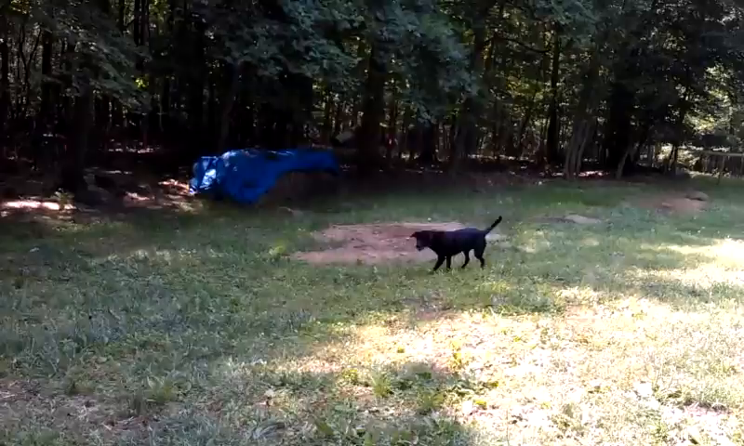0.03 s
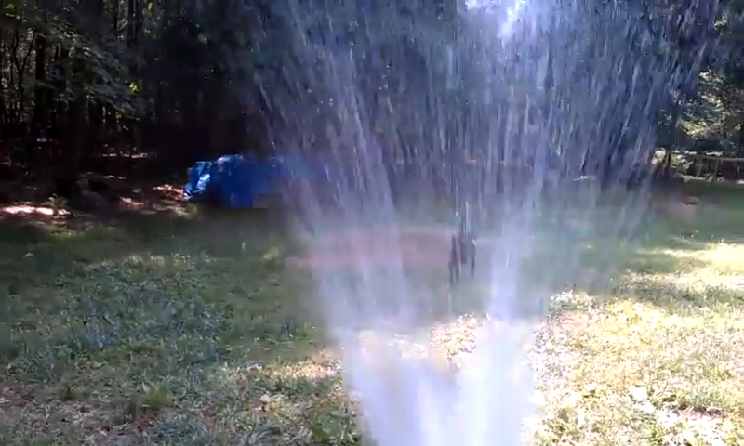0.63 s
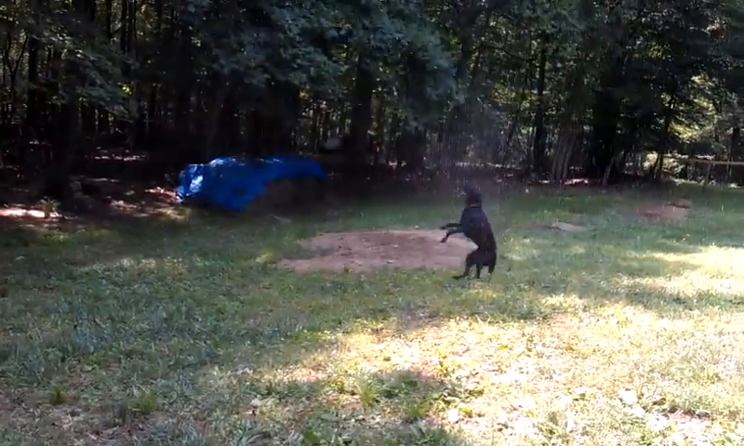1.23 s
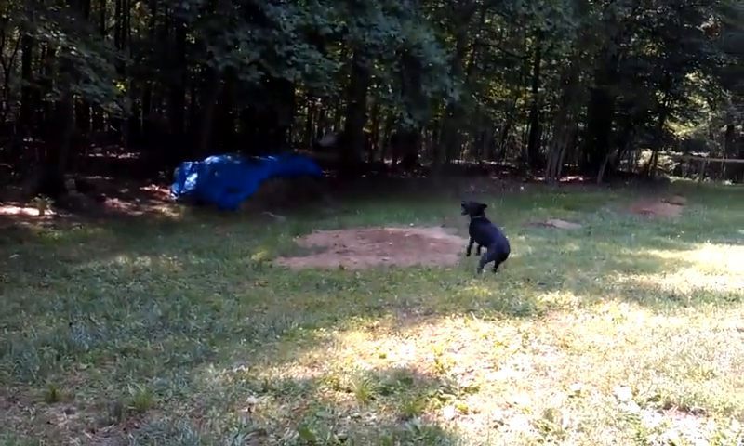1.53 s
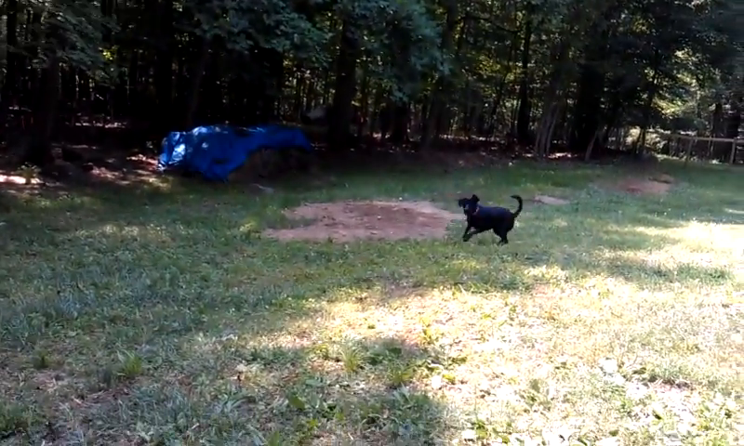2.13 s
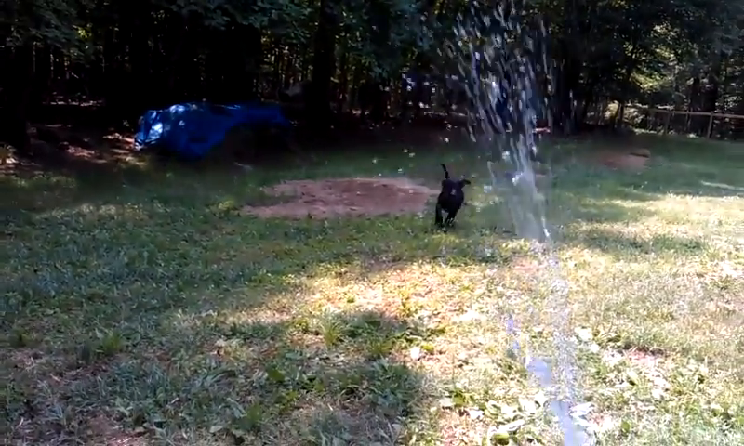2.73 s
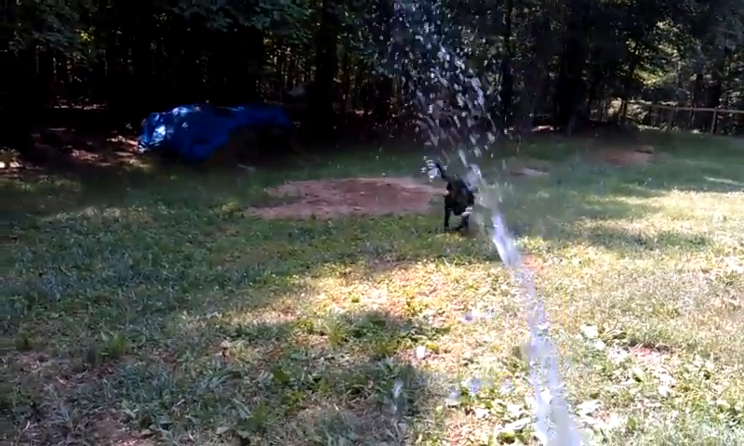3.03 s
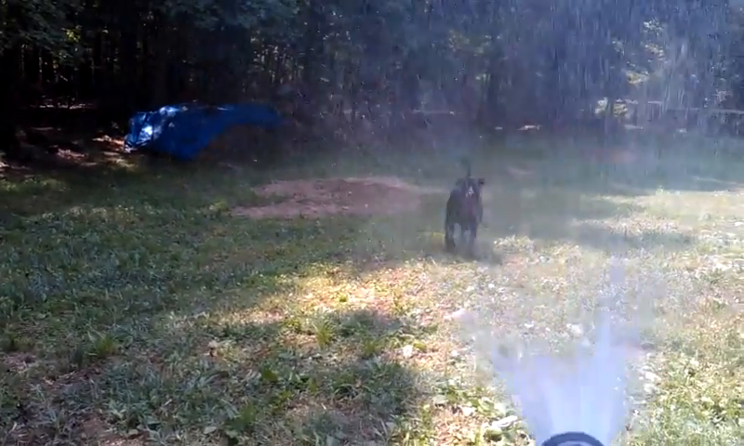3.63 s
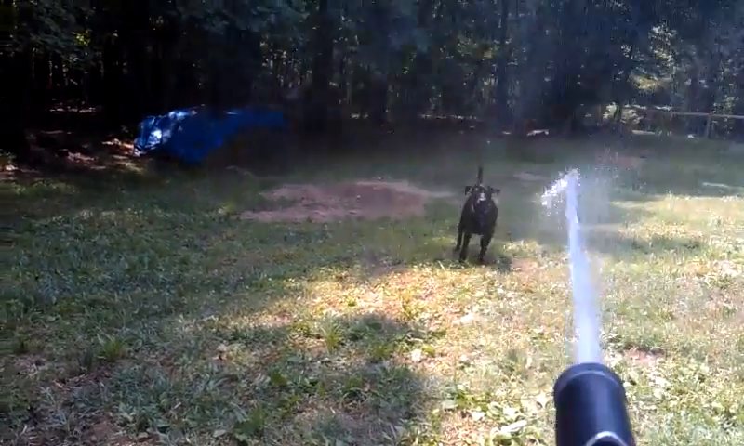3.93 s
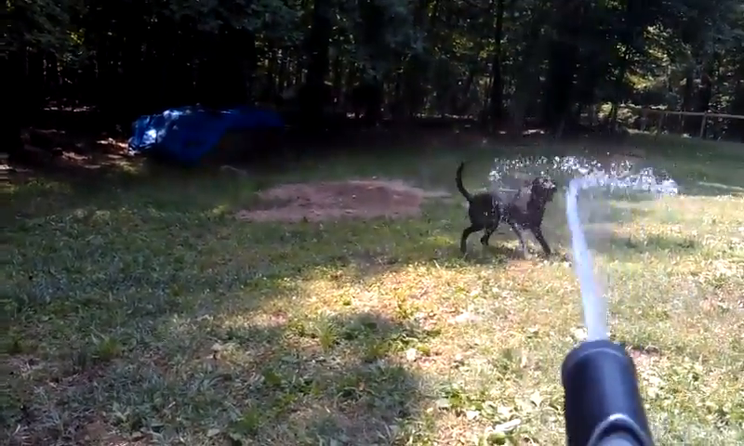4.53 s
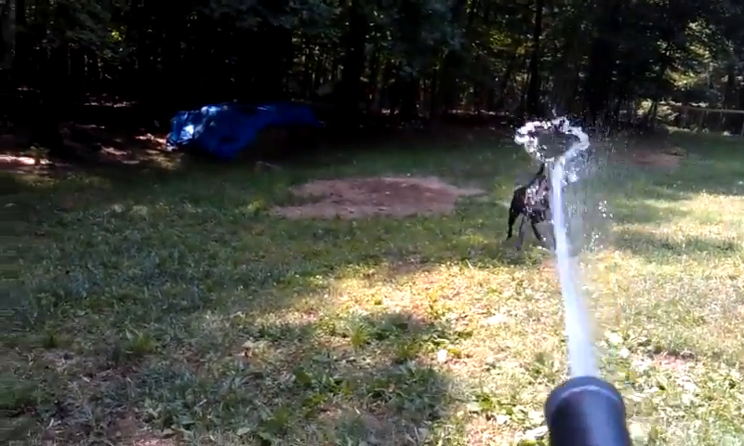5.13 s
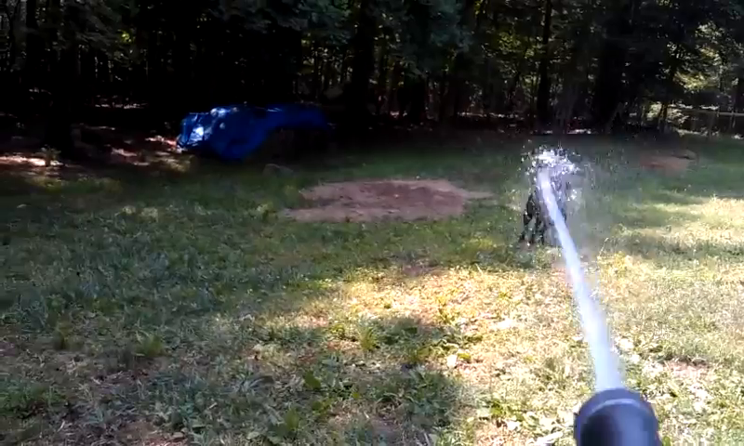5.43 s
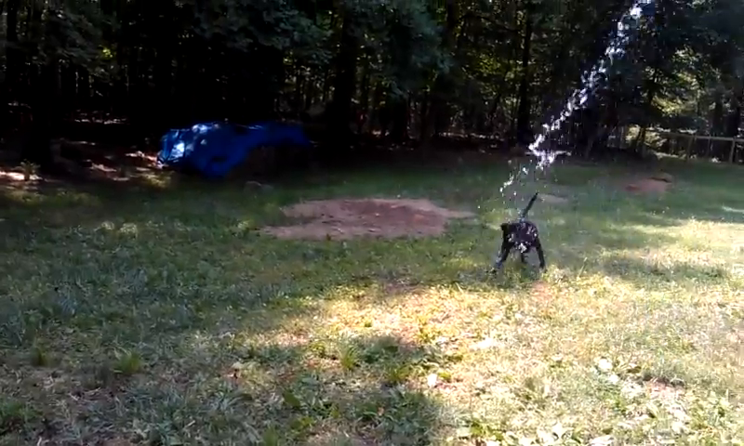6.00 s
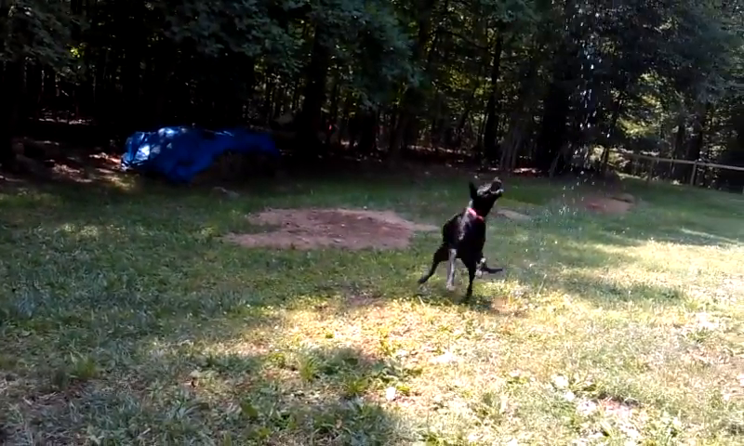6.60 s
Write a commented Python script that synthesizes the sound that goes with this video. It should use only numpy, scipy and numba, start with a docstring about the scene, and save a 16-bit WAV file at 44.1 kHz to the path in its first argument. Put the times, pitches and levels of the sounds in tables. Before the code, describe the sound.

A garden hose nozzle is heard close up on a quiet lawn. At about 0.3 seconds it releases a bright, hissing burst of water, with a quick valve rattle near 0.5, and shuts off at 0.8. In the pause there is soft outdoor air, faint drops ticking on grass, a very faint distant machine hum and two tiny taps around 1.8. At 2.7 a thin hiss returns and swells into a spray from 3.1, with a few small clicks. Near 3.8 the valve chatters and gives one sharp click as the spray narrows into a steady jet with a high, ringing hiss. A hand bumps the microphone dully at about 4.4. The jet slowly sinks in pitch and sputters more, with small air pops crowding together from 5.6, and is still running at the end, near 6.8 seconds.

```python
"""A garden hose's twist nozzle, close by on a quiet lawn: a short burst, a pause, then a dribble that
opens into a cone of spray and narrows to a jet. The valve gap hisses, the cone tears into droplets and
the valve chatters where cone turns to jet. Turbulence rings the nozzle, lower and more sputtering as it
opens; air pockets pop in it. Stray drops tick on the grass, two faint taps fall in the pause,
a hand bumps, a machine hums far away."""
import sys
import numpy as np
from scipy import signal
from scipy.fft import rfft, irfft, next_fast_len
from scipy.io import wavfile
from numba import njit

SR = 44100
rng = np.random.default_rng(int(sys.argv[2]) if len(sys.argv) > 2 else 0)


def store_wav(level_fs):
    """Save 16-bit WAV to argv[1]."""
    pcm = np.round(np.clip(np.atleast_2d(level_fs), -1, 1) * 32767)
    wavfile.write(sys.argv[1], SR, pcm.T.astype(np.int16))


N = 298116

# Spectra of the noise sources. Each row: frequency in Hz, level in dB.
GARDEN_SPECTRUM = [(25, -20), (45, -26), (95, -7), (150, -11.5), (290, -9), (580, -11), (1300, -11.5),
                   (2300, -8.5), (3900, -13), (5000, -20), (6600, -23.5), (9800, -21), (15500, -22.5)]
GAP_SPECTRUM = [(300, -42), (1300, -5), (2000, 3.5), (3300, 4.5), (4400, -7), (5200, 1.5), (7000, -2),
                (8600, 0.5), (10000, 2.5), (11200, 4), (12200, -2.5), (12800, 3), (13550, -3.5), (14300, 3),
                (16000, -2)]
SQUIRT_SPECTRUM = [(4000, -32), (7500, -0.5), (10500, 2), (13000, -5), (16000, -6)]
CONE_SPECTRUM = [(40, -48), (100, -17.5), (200, -5.5), (520, -6.5), (900, -1.5), (1500, -1), (2300, 3.5),
                 (3200, 0.5), (4200, -7.5), (5200, -11.5), (7000, -22.5), (8500, -12.5), (11000, -20.5),
                 (16000, -57)]
RUSH_SPECTRUM = [(100, -37), (300, -11.5), (580, -16), (820, -6), (1400, -3.5), (2050, 2), (2800, 1),
                 (3400, 2), (4200, -5), (6000, -23), (16000, -49)]
PATTER_SPECTRUM = [(1500, -14), (4000, -2), (9000, -1), (16000, -1)]
# Hiss of the open valve. Each row: start, end, rise and fall in seconds, level in dB.
VALVE_OPEN = [(0.24, 0.792, 0.064, 0.032, -39), (2.675, 7, 0.055, .05, -43)]
# Flares where the twist pinches the gap. Each row: time in seconds, level in dB, decay in seconds.
GAP_PINCHES = [(0.302, -33, 0.0092), (0.362, -31.5, 0.05), (.42, -33.5, 0.088), (.73, -30.5, 0.023),
               (2.733, -47, .02), (3.14, -40.5, 0.16), (3.68, -37, 0.14), (3.83, -42, 0.18)]
# Leaks past the seal. Each row: time in seconds, level in dB, length in seconds.
SEAL_SQUIRTS = [(0.282, -41.5, 0.03), (0.7242, -27, 0.005), (6.032, -43, .005), (6.079, -40, .006),
                (6.44, -42, .008), (6.531, -44, .005), (6.56, -44, 0.033), (6.572, -36, 0.0022)]
# Water fanning out. Each row: start, end, rise and fall in seconds, level in dB.
CONE_SPANS = [(0.298, 0.44, 0.026, 0.053, -32), (0.635, 0.769, 0.023, 0.013, -33.5),
              (3.115, 3.617, 0.18, 0.099, -35.5), (3.547, 3.786, 0.08, 0.073, -33.5),
              (3.894, 4.25, 0.16, 0.26, -47)]
# Water gathered in a jet. Each row: start, end, rise and fall in seconds, rush and ring gains in dB.
JET_SPANS = [(0.382, 0.691, 0.027, .06, -36, -0.5), (3.145, 3.755, 0.1, 0.051, -57, -7.5),
             (3.721, 7, 0.033, .06, -41.5, 0)]
# Nozzle tuning. Each row: time in seconds, main mode in Hz, low mode in Hz, low mode drive in dB.
TWIST_CURVE = [(.6, 6370, 5150, -6), (3.2, 6400, 5000, -8), (3.6, 6400, 4960, -0.5), (3.8, 6700, 5320, -4),
               (4.22, 6000, 5150, 1), (4.48, 5830, 5340, 0), (4.75, 5780, 5080, 1.5),
               (5.05, 5420, 4720, -1), (5.5, 5360, 4400, 1), (5.88, 5030, 4320, -1), (6.03, 4920, 4070, -2),
               (6.3, 4640, 3750, -1.5), (6.76, 4680, 3920, -1)]
# Nozzle ring, one list each for the short, narrow and wide jet. Each row: time in seconds, gain in dB.
RING_CURVES = [
    [(0.47, -34.5), (0.626, -34.5), (0.63, -33)],
    [(3.86, -37), (4.7, -39.5), (5.88, -39), (5.92, -41)],
    [(6.0, -35), (6.76, -35.5)],
]
# Notch between ring and sizzle. Each row: time in seconds, centre in Hz, depth from 0 to 1.
NOTCH_CURVE = [(.38, 7750, 0.4), (.44, 8300, 0), (.52, 9260, 0.45), (2.8, 8700, 0.9), (3.5, 8560, 0.65),
               (4.2, 8640, 0.7), (4.8, 8150, 0.56), (5.4, 8400, 0.75), (5.88, 8000, 1), (6.03, 7200, 0.9),
               (6.3, 6950, .95)]
# Sizzling overtone. Each row: time in seconds, level in dB relative to the ring.
SIZZLE_CURVE = [(3.3, -6.5), (3.9, -16), (4.5, -13.5), (5.05, -16.5), (5.6, -10.5), (5.92, -9), (6.05, -13),
                (6.3, -16.5)]
# Large gulps of air in the jet. Each row: time in seconds, gain in dB.
AIR_GULPS = [(5.972, -1.5), (6.21, 4), (6.444, 4), (6.506, 2.5), (6.683, 2.5)]
# Valve chatter. Each row: last contact, last gap and length in seconds, last level in dB,
# pitch in Hz, after-ring gain in dB.
VALVE_RATTLES = [(.4574, .0165, 0.054, -10.5, 3400, -8), (0.5808, 0.0035, 0.0089, -18.5, 3230, -13),
                 (3.775, .0092, 0.039, -15.5, 2650, -37)]
# Two faint taps in the pause, then sharp clicks of the valve.
# Each row: time in seconds, level in dB, pitch in Hz, after-ring and edge gains in dB.
SINGLE_CLICKS = [(1.803, -45, 3450, 5, -40), (1.827, -37, 2140, -10, -40), (3.1033, -20, 2800, -11.5, -35),
                 (3.2478, -22.5, 2700, -25, -18), (3.589, -19.5, 2620, -27, -22),
                 (3.8394, -9, 2800, -29, -10)]
# Loudest air pops. Each row: time in seconds, level in dB, pitch in Hz.
AIR_SPITS = [(4.0201, -33, 5240), (4.137, -21, 5400), (4.3617, -24, 5360), (4.695, -21.5, 5100),
             (4.832, -25, 5230), (4.8432, -21.5, 5340), (5.6045, -20, 5200), (5.7094, -23, 5200),
             (5.7323, -25, 5200), (5.808, -21, 5200), (5.816, -25, 5100), (5.968, -25, 4990),
             (6.011, -25, 4900), (6.0371, -22, 4900), (6.1051, -22, 4750), (6.1426, -23, 4750),
             (6.1538, -21, 4750), (6.1739, -19, 4750), (6.2515, -19, 4460), (6.2577, -19, 4620),
             (6.4032, -26, 4700), (6.4173, -27, 4700), (6.4253, -20, 4930), (6.4401, -19, 4680),
             (6.447, -21, 4700), (6.6267, -20, 4680), (6.6816, -20, 4870), (6.7125, -20.5, 4700)]
# Dull knocks. Each row: time in seconds, level in dB.
HAND_BUMPS = [(4.4393, -26), (4.4673, -44)]

NARROW_HZ = 6000   # main mode of the narrow nozzle
TIME_S = np.arange(N) / SR
HIT_TIME_S = np.arange(SR // 20) / SR


def from_db(db):
    """Decibels to gain."""
    return 10 ** (np.asarray(db) / 20)


def unit_rms(x):
    """Scale to rms 1."""
    return x / np.sqrt(np.mean(x ** 2) + 1e-20)


def curves(rows):
    """Each column after the time, interpolated per sample."""
    times_s, *columns = np.transpose(rows)
    return [np.interp(TIME_S, times_s, column) for column in columns]


def envelope(start_s, end_s, rise_s, fall_s):
    """Linear rise and fall, capped at 1."""
    return np.clip((TIME_S - start_s) / rise_s, 0, 1) * np.clip((end_s - TIME_S) / fall_s, 0, 1)


def coloured(x, spectrum):
    """Filter by a spectrum, falling 6 dB per octave below its first point; rms 1."""
    hz, level_db = np.transpose(spectrum)
    size = next_fast_len(N)
    bins_hz = np.maximum(np.arange(size // 2 + 1) * SR / size, 1)
    gain = from_db(np.interp(np.log(bins_hz), np.log(hz), level_db)) * np.minimum(bins_hz / hz[0], 1)
    return unit_rms(irfft(rfft(x, size) * gain, size)[:N])


def drift(rate_hz):
    """Smooth random motion; rms 1."""
    pole = np.exp(-2 * np.pi * rate_hz / SR)
    smooth = signal.lfilter([1], [1, -2 * pole, pole * pole], rng.standard_normal(N + SR))
    return unit_rms(smooth)[SR:]


def flicker(depth_db, rate_hz):
    """Random gain that keeps the mean power."""
    gain = from_db(depth_db * np.clip(drift(rate_hz), -2.8, 2.8))
    return gain / np.exp(np.log(from_db(depth_db)) ** 2)


def grains(per_s, spread_db):
    """Random impulses of uneven size; rms 1."""
    sizes = from_db(spread_db * np.minimum(rng.exponential(1, N), 4)) * rng.choice([-1, 1], N)
    return unit_rms(sizes * (rng.random(N) < per_s / SR))


def grainy_noise(grain_db, per_s, spread_db):
    """White noise plus impulses."""
    return rng.standard_normal(N) + from_db(grain_db) * grains(per_s, spread_db)


@njit
def resonate(x, hz, radius):
    """Two-pole band-pass with moving centre and pole radius; peak gain 1."""
    y = np.zeros(len(x))
    for i in range(2, len(x)):
        r = radius[i]
        feedback = 2 * r * np.cos(2 * np.pi * hz[i] / SR) * y[i - 1] - r ** 2 * y[i - 2]
        y[i] = (1 - r ** 2) / 2 * (x[i] - x[i - 2]) + feedback
    return y


def cavity(x, hz, width_hz):
    """Moving resonance, applied twice for steep flanks; white noise keeps its power."""
    radius = np.exp(-np.pi * width_hz / SR) * np.ones(N)
    return resonate(resonate(x, hz, radius), hz, radius) * np.sqrt(2 * SR / (np.pi * width_hz))


def notch(x, hz, width_hz, depth):
    """Moving antiresonance: cancels a share of one band."""
    radius = np.full(N, np.exp(-np.pi * width_hz / SR))
    return x - np.clip(depth, 0, 1) * resonate(x, hz, radius)


def highpass(x, hz, order):
    """Butterworth low cut."""
    return signal.sosfilt(signal.butter(order, hz, "high", fs=SR, output="sos"), x + 1e-18)


def ping(hz, rise_s):
    """Sine that swells to 1 and dies nearly as fast."""
    swell = (HIT_TIME_S / rise_s * np.exp(1 - HIT_TIME_S / rise_s)) ** 3
    return swell * np.sin(2 * np.pi * hz * HIT_TIME_S)


def struck_mode(hz, t60_s):
    """Sine that decays from 1."""
    return from_db(-60 * HIT_TIME_S / t60_s) * np.sin(2 * np.pi * hz * HIT_TIME_S)


def add(out, at_s, sound):
    """Mix in a short sound."""
    i = round(at_s * SR)
    out[i:i + len(sound)] += sound[:N - i]


def garden_air(level_db=-54):
    """Soft outdoor air with fine drops ticking on the grass."""
    air = coloured(grainy_noise(grain_db=-9.5, per_s=700, spread_db=1.5), GARDEN_SPECTRUM)
    return from_db(level_db) * air * flicker(depth_db=0.16, rate_hz=8.7)


def gap_hiss(sag_db_per_s=3.5, pinch_rise_s=0.023):
    """The valve gap hisses and spatters, easing as it widens and flaring at each pinch."""
    power = np.zeros(N)
    for start_s, end_s, rise_s, fall_s, level_db in VALVE_OPEN:
        flow = envelope(start_s, end_s, rise_s, fall_s) ** 2   # the seal lifts gradually
        power += (flow * from_db(level_db - sag_db_per_s * (TIME_S - start_s))) ** 2
    for at_s, level_db, decay_s in GAP_PINCHES:
        rise_s = min(pinch_rise_s, 0.5 * decay_s)
        away = np.maximum((at_s - TIME_S) / rise_s, (TIME_S - at_s) / decay_s)
        power += (from_db(level_db) * np.exp(-np.minimum(away, 20))) ** 2
    spatter = coloured(grainy_noise(grain_db=-5.5, per_s=2500, spread_db=2.2), GAP_SPECTRUM)
    return np.sqrt(power) * spatter * flicker(depth_db=2, rate_hz=4)


def air_bursts(per_s, spread_db, decay_s):
    """Air pockets burst at random, each a jump that decays; mean 0, rms 1."""
    pole = np.exp(-1 / (decay_s * SR))
    jumps = signal.lfilter([1], [1, -pole], np.abs(grains(per_s, spread_db)) + 1e-18)
    return unit_rms(jumps - jumps.mean())


def sputter_gain(pitch_hz, narrow_db=1.5, db_per_octave=2):
    """Air in the water: quick spurts, deeper as the pitch sinks, and a few large gulps."""
    depth = from_db(narrow_db - db_per_octave * np.log2(pitch_hz / NARROW_HZ)) - 1
    spurts = air_bursts(per_s=420, spread_db=4, decay_s=0.00083)
    spurts += 0.27 * air_bursts(per_s=170, spread_db=2.5, decay_s=0.008)
    gulp_db = sum(gain_db / (1 + ((TIME_S - at_s) / 0.0061) ** 4) for at_s, gain_db in AIR_GULPS)
    return from_db(gulp_db) * np.maximum(1 + depth * spurts, 0) / np.sqrt(1 + depth ** 2)


def seal_squirts():
    """Water slips past the seal in puffs of bright hiss."""
    gain = np.zeros(N)
    for at_s, level_db, length_s in SEAL_SQUIRTS:
        puff = envelope(at_s - length_s / 4, at_s + 1.22 * length_s, length_s / 2, length_s)
        gain += from_db(level_db) * puff
    return gain * coloured(rng.standard_normal(N), SQUIRT_SPECTRUM)


def cone_spray():
    """The water sheet tears into droplets, fluttering slightly."""
    gain = sum(from_db(level_db) * envelope(*span) for *span, level_db in CONE_SPANS)
    droplets = coloured(grains(per_s=22000, spread_db=1.5), CONE_SPECTRUM)
    return gain * droplets * flicker(depth_db=0.55, rate_hz=140)


def turbulence(gain):
    """Grainy flow noise that drives the jet."""
    return gain * unit_rms(grainy_noise(grain_db=-3.5, per_s=3500, spread_db=4.5))


def follow_pitch(pitch_hz, narrow_hz, power):
    """A nozzle frequency tied to the main mode by a power law."""
    return narrow_hz * (pitch_hz / NARROW_HZ) ** power


def eddy_wander():
    """Pitch factor: eddies push it about 2 % up and down."""
    return np.exp(0.021 * drift(rate_hz=12))


def mode_gain(hz, best_hz=4920, best_db=-5, fall_db_per_octave2=46):
    """A resonance weakens away from its best pitch."""
    return from_db(best_db - fall_db_per_octave2 * np.log2(hz / best_hz) ** 2)


def jet_rush(sputter, pitch_hz, db_per_octave=4.5):
    """Low rush of the turbulent jet, weaker as the pitch sinks."""
    gain = sum(from_db(rush_db) * envelope(*span) for *span, rush_db, _ in JET_SPANS)
    gain *= from_db(db_per_octave * np.log2(pitch_hz / NARROW_HZ))
    return gain * coloured(turbulence(sputter ** 0.78), RUSH_SPECTRUM)


def nozzle_ring(sputter, pitch_hz, low_hz, low_db, notch_hz):
    """Turbulence drives the nozzle's broad ring, two overtones, hollow body and two narrow modes."""
    ring_hz = follow_pitch(pitch_hz, narrow_hz=5550, power=0.64)
    width_hz = follow_pitch(pitch_hz, narrow_hz=2070, power=1.37)
    broad = from_db(-1.5) * cavity(turbulence(sputter), ring_hz, 1.22 * width_hz)
    overtone = from_db(-15) * cavity(turbulence(sputter ** 0.55), 3.1 * ring_hz, 2.8 * width_hz)
    overtone *= flicker(depth_db=2.5, rate_hz=6.7)

    sizzle_db, = curves(SIZZLE_CURVE)
    sizzle_hz = 9900 * (notch_hz / 8450) ** 0.41
    sizzle = cavity(turbulence(sputter ** 0.64), sizzle_hz * eddy_wander(), width_hz=1300)
    sizzle *= from_db(sizzle_db) * flicker(depth_db=1.6, rate_hz=12)

    body_hz = follow_pitch(pitch_hz, narrow_hz=2973, power=1)
    body = cavity(turbulence(sputter), body_hz, width_hz=490)
    body *= mode_gain(body_hz, best_hz=2730, best_db=-10, fall_db_per_octave2=144)

    pops = from_db(-9) * grains(per_s=41, spread_db=3.5)   # small air pockets strike both modes
    low = from_db(low_db) * mode_gain(low_hz) * cavity(turbulence(sputter) + pops, low_hz, width_hz=440)
    main_width_hz = follow_pitch(pitch_hz, narrow_hz=750, power=3.6)
    main = mode_gain(pitch_hz) * cavity(turbulence(sputter) + pops, pitch_hz, main_width_hz)

    ring_db, = curves(np.vstack(RING_CURVES))
    running = sum(from_db(share_db) * envelope(*span) for *span, _, share_db in JET_SPANS)
    return running * from_db(ring_db) * (broad + overtone + sizzle + body + low + main)


def valve_chatter(gap_ratio=0.855, gap_power=0.47, min_gap_s=0.0015, edge_db=-16.5):
    """Click rows of the valve chattering, slower and harder until it comes free."""
    contacts = []
    count = np.arange(20)   # back from the last contact
    for last_s, last_gap_s, length_s, level_db, hz, after_db in VALVE_RATTLES:
        gaps_s = np.maximum(last_gap_s * gap_ratio ** count / (count + 1) ** gap_power, min_gap_s)
        for k, early_s in enumerate(np.append(0, np.cumsum(gaps_s))):
            if early_s <= length_s:
                loss_db = min(0.2 * k ** 2, 9)
                contacts.append((last_s - early_s, level_db - loss_db, hz, after_db, edge_db))
    return contacts


def clicks():
    """Valve clicks and two faint taps: a few cycles each; hard ones have a bright edge, some ring on."""
    out = np.zeros(N)
    edge = from_db(3.5) * ping(10600, rise_s=0.00007) + from_db(1.5) * ping(4320, rise_s=0.00051)
    after_ring = from_db(-2.5) * ping(3840, rise_s=0.0013) + from_db(-3) * struck_mode(3480, t60_s=0.029)
    for at_s, level_db, hz, after_db, edge_db in list(SINGLE_CLICKS) + valve_chatter():
        click = ping(hz, rise_s=1.39 / hz) + from_db(edge_db) * edge + from_db(after_db) * after_ring
        add(out, at_s, from_db(level_db) * click)
    return highpass(out, hz=1900, order=4)   # small parts radiate no bass


def drop_patter(level_db=-67.5, length_s=1.7):
    """Stray drops tick on the grass as the first burst comes down, then fade."""
    closed_s = VALVE_OPEN[0][1]
    landing = envelope(closed_s, closed_s + length_s, rise_s=0.1, fall_s=0.84)
    return from_db(level_db) * landing * coloured(grains(per_s=45, spread_db=0.5), PATTER_SPECTRUM)


def machine_hum(hz=187.5, level_db=-68.5, start_s=0.88, rise_s=0.42):
    """A distant machine: one slightly drifting tone that fades in."""
    phase = 2 * np.pi * np.cumsum(hz + 0.5 * drift(rate_hz=1.8)) / SR
    fade_in = np.clip((TIME_S - start_s) / rise_s, 0, 1)
    return from_db(level_db) * fade_in * np.sqrt(2) * np.sin(phase)


def air_spits():
    """Larger air pockets pop in the nozzle, each with a thin crack on top."""
    out = np.zeros(N)
    crack = from_db(-6) * ping(3200, rise_s=0.00037) + from_db(-13) * ping(12000, rise_s=0.00008)
    for at_s, level_db, hz in AIR_SPITS:
        add(out, at_s, from_db(level_db) * (ping(hz, rise_s=0.00046) + crack))
    return out


def hand_bumps():
    """The hand knocks the microphone case: one low mode and a faint tap."""
    out = np.zeros(N)
    knock = struck_mode(264, t60_s=0.023) + from_db(-8) * ping(1200, rise_s=0.00037)
    for at_s, level_db in HAND_BUMPS:
        add(out, at_s, from_db(level_db) * knock)
    return highpass(out, hz=190, order=3)


def scene():
    """The twist tunes the nozzle; air in the water shakes jet and hiss together. Dual mono."""
    pitch_hz, low_hz, low_db = curves(TWIST_CURVE)
    notch_hz, notch_depth = curves(NOTCH_CURVE)
    sputter = sputter_gain(pitch_hz)
    jet = jet_rush(sputter, pitch_hz) + nozzle_ring(sputter, pitch_hz, low_hz, low_db, notch_hz)
    water = jet + gap_hiss() * sputter ** 0.75 + cone_spray() + air_spits()
    water = notch(water, follow_pitch(pitch_hz, narrow_hz=4380, power=1.1), width_hz=170, depth=0.29)
    notch_depth *= flicker(depth_db=1.8, rate_hz=7.6)
    water = notch(water, notch_hz * eddy_wander(), width_hz=1720, depth=notch_depth)
    near = water + seal_squirts() + clicks() + hand_bumps()
    lawn = garden_air() + drop_patter() + machine_hum()
    return np.tile(near + lawn, (2, 1))


def record(dry, cutoff_hz=15720):
    """Steep elliptic low-pass."""
    return signal.sosfilt(signal.ellip(12, 0.1, 70, cutoff_hz, fs=SR, output="sos"), dry)


dry = scene()
out = record(dry)
store_wav(out)
```